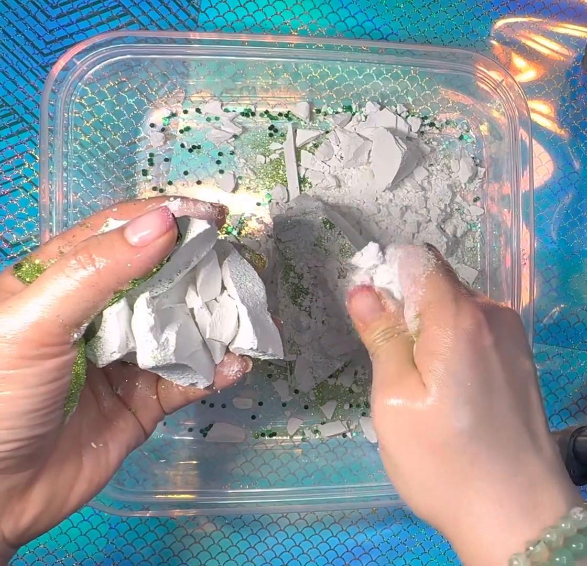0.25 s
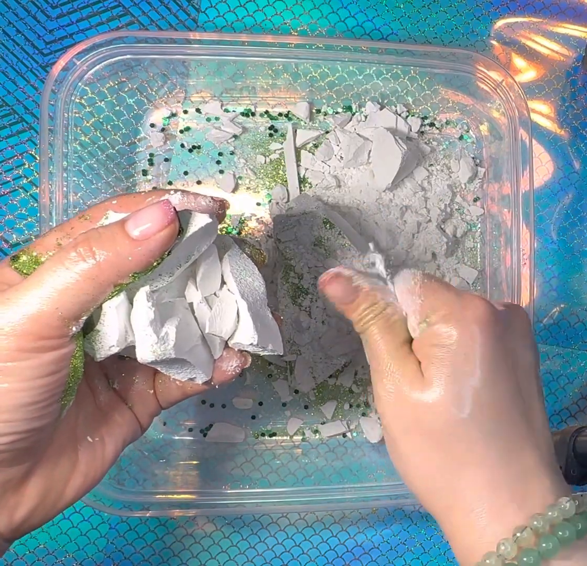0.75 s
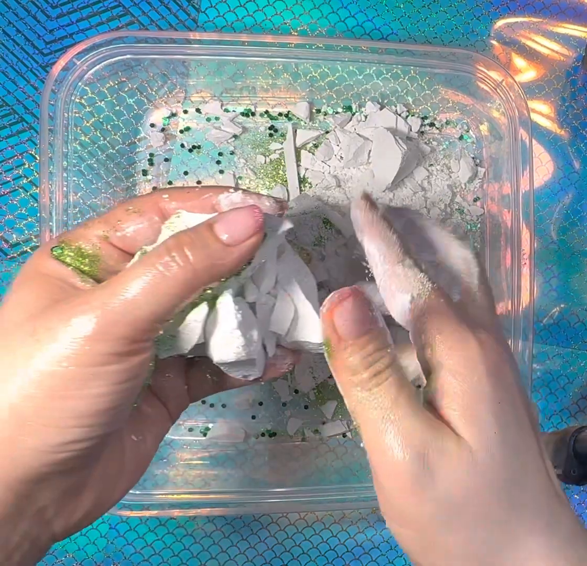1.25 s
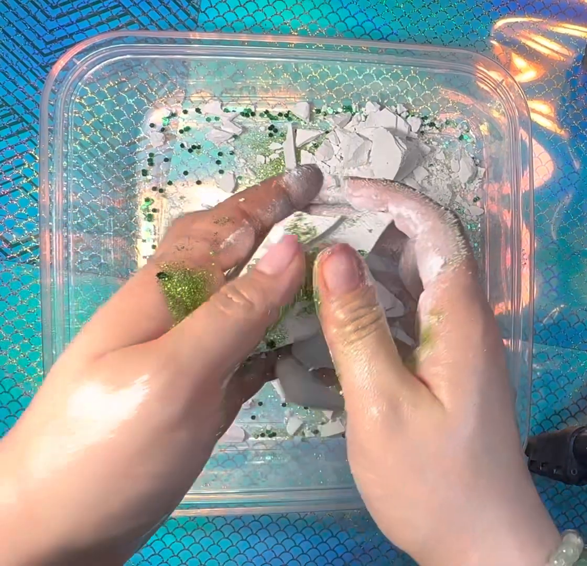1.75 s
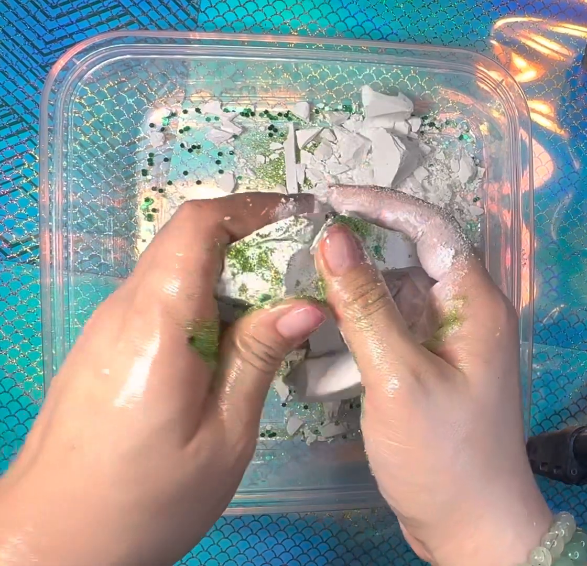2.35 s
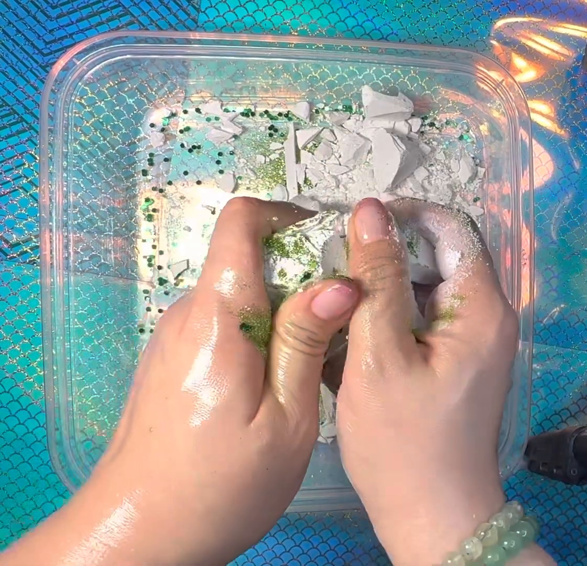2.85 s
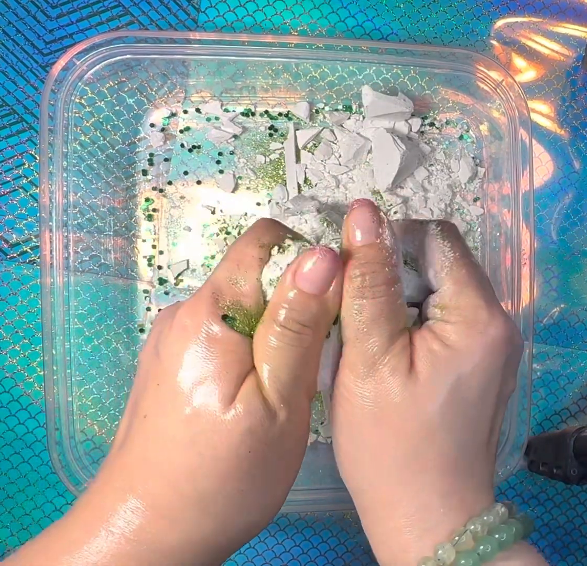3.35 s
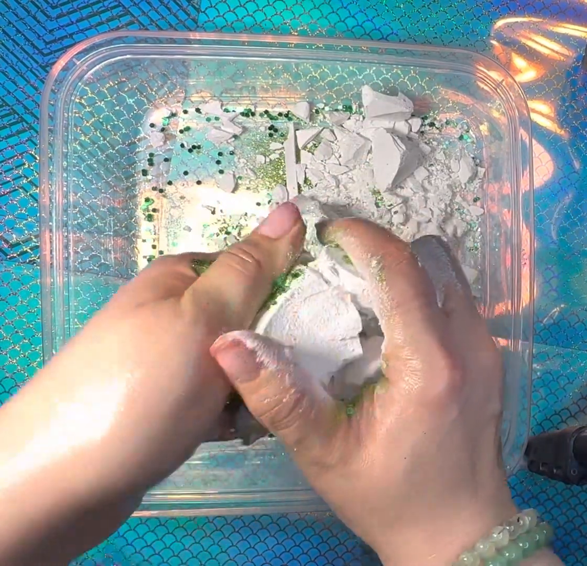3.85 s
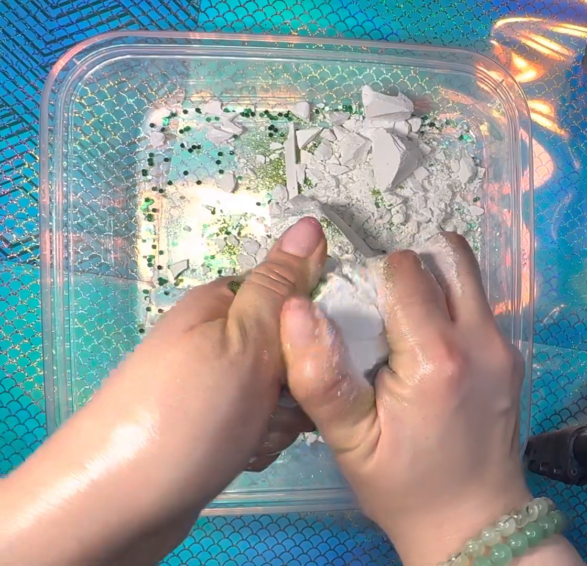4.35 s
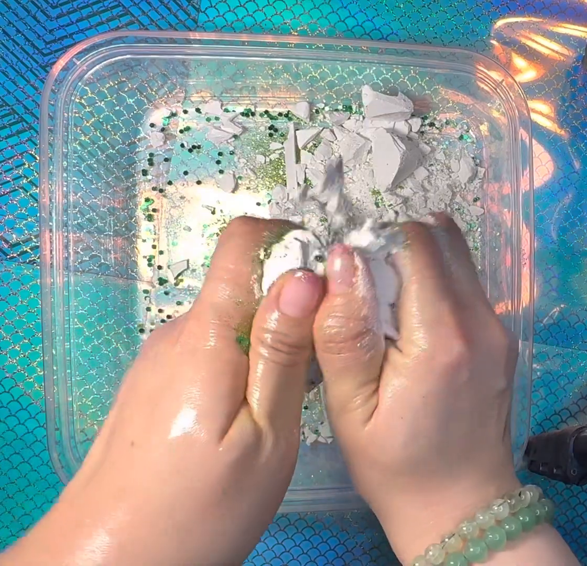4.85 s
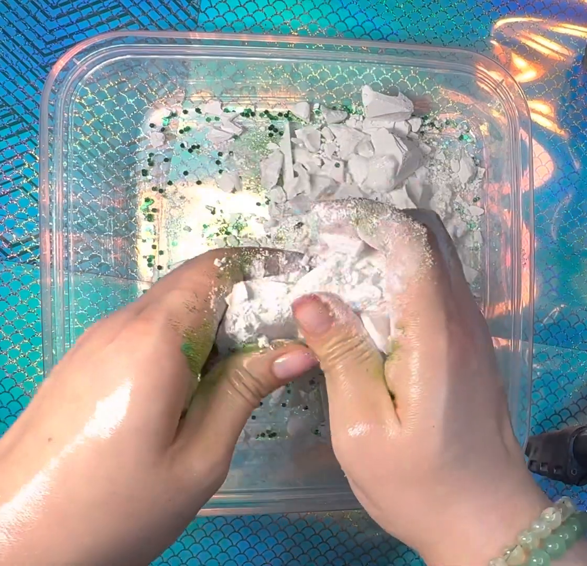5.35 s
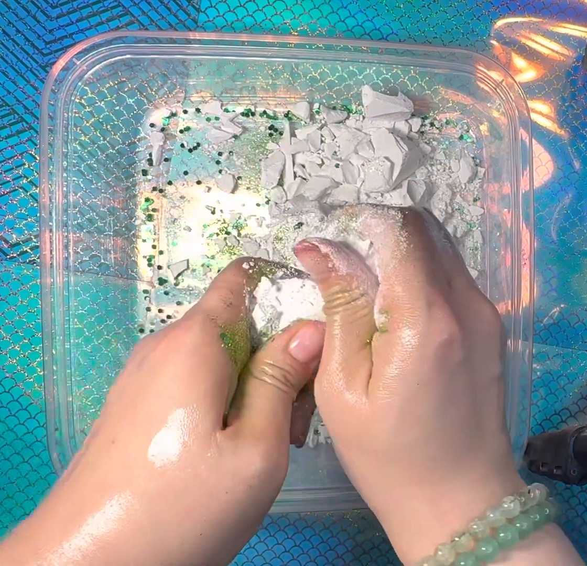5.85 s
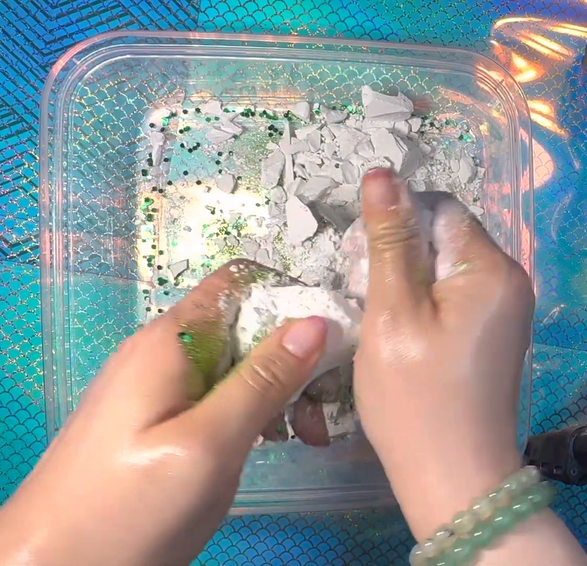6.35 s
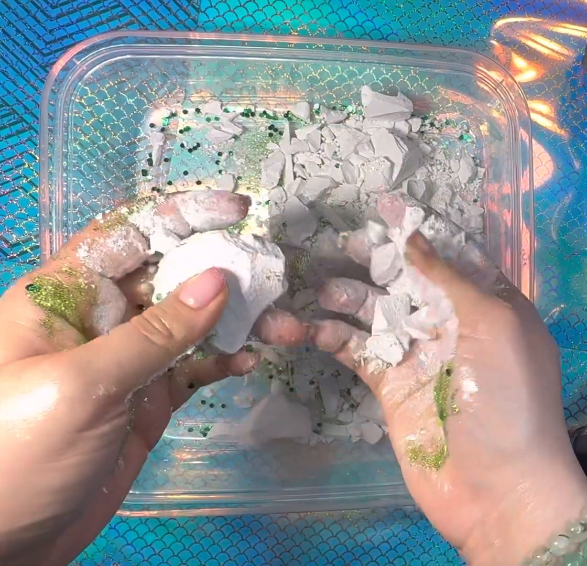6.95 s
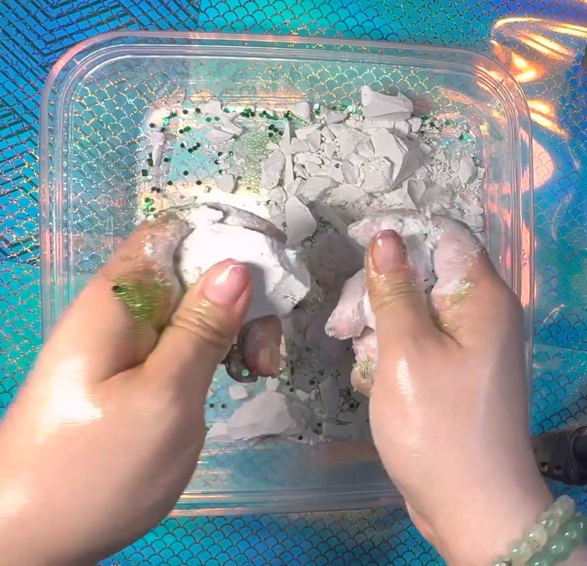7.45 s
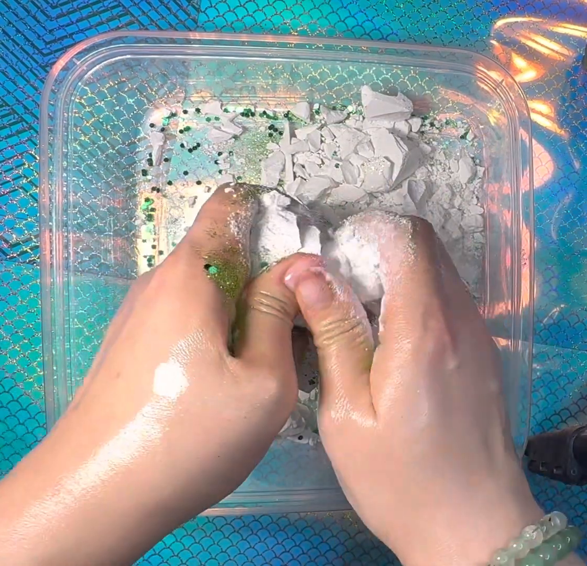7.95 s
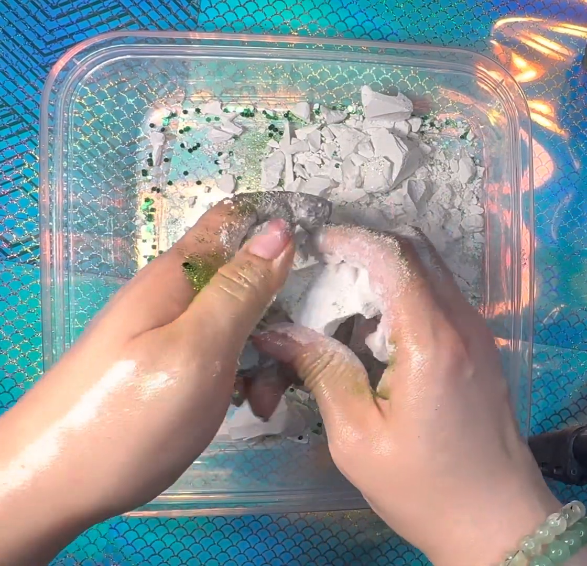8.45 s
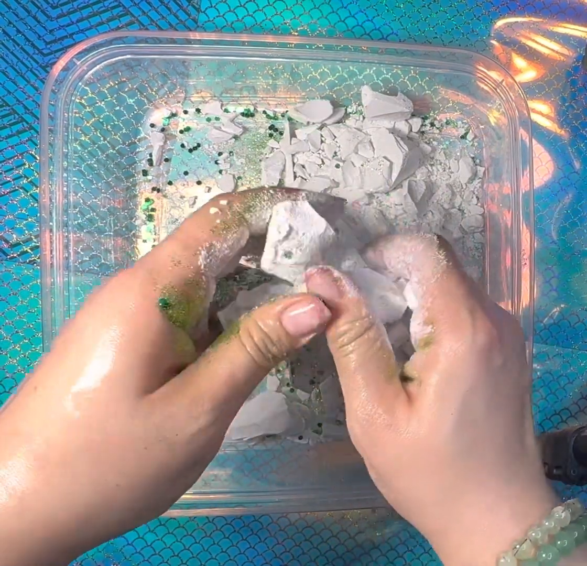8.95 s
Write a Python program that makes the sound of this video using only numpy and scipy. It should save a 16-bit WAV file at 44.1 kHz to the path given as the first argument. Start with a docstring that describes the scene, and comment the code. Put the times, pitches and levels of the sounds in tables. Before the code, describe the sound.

Close-up stereo sound of brittle chalk blocks breaking between dusty hands indoors. Hollow, mid-pitched pops and crisp ticks come irregularly over fine crackle, skin rubbing and soft handling rumble. After a sparse start, the crumbling grows dense, peaks with a heavy crack and dull tub thuds, then continues in separated snaps and soft crumbs. Short room reflections, very faint low air.

```python
"""A small room: two hands squeeze dry gym chalk over a plastic tub, close to a stereo microphone.
Each fracture sums a burst of stepped noise (crack), decaying sines (hollow ring) and a low pulse (push).
Between fractures, dense random grains crackle as crumbs and shaped noise hisses as powder and skin.
Falling pieces excite the damped modes of the tub; sparse echoes and a noise tail make the room."""
import sys
import numpy as np
from scipy import signal
from scipy.fft import rfft, irfft, next_fast_len
from scipy.io import wavfile
from scipy.ndimage import map_coordinates

SR = 44100
rng = np.random.default_rng(int(sys.argv[2]) if len(sys.argv) > 2 else 0)


def wrap_up_sound(samples):
    """Save the sound to the file named by the first command line argument, as 16-bit audio."""
    columns = np.atleast_2d(samples).T
    # keep every value between -1 and 1, then stretch to whole-number steps
    tamed = np.clip(columns, -1, 1)
    steps = np.round(tamed * 32767).astype(np.int16)
    wavfile.write(sys.argv[1], SR, steps)


N = 405719  # length in samples
SIDES = np.array([[1], [-1]])  # left, right


def amp(db):
    """Level to gain: 20 dB is a factor of ten in amplitude."""
    return 10 ** (np.asarray(db) / 20)


def unit(x):
    """Power normalisation: scaled to rms 1."""
    return x / np.sqrt(np.mean(x ** 2) + 1e-20)


def burst(x):
    """Energy normalisation: scaled to the energy of 5 ms at rms 1."""
    return x / np.sqrt(np.sum(x ** 2) / (SR * .005) + 1e-20)


def along(points, hz):
    """Interpolation of (Hz, value) points on a logarithmic frequency axis."""
    f, v = np.transpose(points)
    return np.interp(np.log(hz + 1), np.log(f + 1), v)


def wobble(rate):
    """Slow random modulation: a smooth curve through `rate` random knots a second."""
    knots = rng.standard_normal(int(N * rate / SR) + 4)
    at = np.arange(0, len(knots) - 1, 1 / 8)
    curve = map_coordinates(knots, [at])
    return np.interp(np.arange(N) * rate / SR, at, curve)


def filtered(x, response):
    """Linear filtering: the spectrum of x times a response of frequency."""
    m = next_fast_len(N + SR // 4)
    hz = np.fft.rfftfreq(m, 1 / SR)
    return irfft(rfft(x, m) * response(hz), m)[..., :N]


def coloured(x, spectrum):
    """Spectral shaping: x filtered by (Hz, dB) points, at rms 1."""
    return unit(filtered(x, lambda hz: amp(along(spectrum, hz))))


def band_noise(order, low_hz, high_hz, count):
    """Band-limited noise at rms 1."""
    band = signal.butter(order, [low_hz, high_hz], 'band', fs=SR, output='sos')
    return unit(signal.sosfilt(band, rng.standard_normal(count)))


def noise(width):
    """Mid-side stereo white noise; width is side over mid."""
    mid, side = rng.standard_normal((2, N))
    return np.array([mid + width * side, mid - width * side])


def add(track, s, sound):
    """Superposition: mix a sound in from time s."""
    i = max(0, round(s * SR))
    room_left = track[..., i:i + sound.shape[-1]]
    room_left += sound[..., :room_left.shape[-1]]


def strike(t, rise, decay):
    """Impact envelope: exponential swell to a rounded top near time 0, then exponential decay."""
    return np.exp(-np.logaddexp(-t / rise, t / decay))


def swells(rows):
    """Gaussian envelopes: a gain that rises and falls around each (s, half length s, dB) row."""
    t = np.linspace(0, N / SR, N // 20)
    gain = sum(amp(db) * np.exp(-((t - s) / half) ** 2) for s, half, db in rows)
    return np.interp(np.arange(N) / SR, t, gain)


def grains(rate, centre_hz, spread, cycles, size_db):
    """Granular synthesis: tiny breaks of random time, size, pitch and side, at rms 1."""
    count = int(rate * N / SR)
    when, pitch, size, pan = rng.random((count, 4)).T[:, :, None]
    hz = centre_hz * np.exp(spread * (2 * pitch - 1))
    k = np.arange(int(min(5 * cycles / centre_hz, .005) * SR))
    turns = hz * k / SR
    gain = amp(size_db * np.minimum(-np.log(1 - size), 4))
    envelope = np.exp(-turns / cycles) * (1 - np.exp(-2 * turns))
    waves = gain * np.sin(2 * np.pi * turns) * envelope
    index = ((when * N).astype(int) + k).ravel()
    panned = [(waves * (1 + side * (pan - .5) * 3.1)).ravel() for side in (1, -1)]
    return unit(np.array([np.bincount(index, w, N)[:N] for w in panned]))


# loud fractures and knocks of chalk; levels before the trims passed to snaps():
# start_s [s], ring_hz [Hz], ring_db [dB], crack_db [dB], push_db [dB]
FRACTURES = [(0.3338, 1906, -47, -34, -60), (0.3422, 2250, -41, -40, -48), (1.0886, 2350, -60, -60.5, -67),
             (1.797, 1370, -47.5, -66.5, -60), (1.856, 1516, -16, -44.5, -41),
             (1.9533, 1460, -41, -60, -58), (2.0843, 1360, -25, -41.5, -41.5), (2.191, 2160, -76, -52, -72),
             (2.306, 1320, -44, -56.5, -47), (2.3924, 1670, -45.5, -49.5, -64),
             (2.4615, 1900, -57, -41, -50), (2.5881, 2370, -50, -46.5, -58), (2.569, 1860, -64, -57, -70),
             (2.606, 2640, -53, -54, -72), (2.6505, 2110, -66, -49.5, -67), (2.721, 1910, -59, -55.5, -72),
             (2.7588, 1660, -46, -72, -68), (2.8471, 2170, -47.5, -49, -61),
             (2.8677, 2240, -45.5, -44, -57), (2.896, 2120, -53.5, -47.5, -73.5),
             (3.0617, 2680, -52.5, -51, -79), (3.194, 2480, -44.5, -45.5, -70),
             (3.285, 2370, -52, -49.5, -60), (3.7579, 1950, -39, -53.5, -54),
             (3.8464, 1420, -36, -66.5, -44), (3.943, 2270, -62, -44.5, -80),
             (4.0116, 2150, -38.5, -35.5, -49.5), (4.0404, 2230, -39, -32, -69.5),
             (4.0661, 1250, -40.5, -59, -53), (4.102, 2200, -57, -53.5, -72),
             (4.2085, 880, -47.5, -53, -62), (4.218, 1410, -47, -62.5, -66), (4.301, 1380, -39, -52, -44.5),
             (4.308, 2390, -40, -42, -51), (4.3211, 1730, -33.5, -47, -47), (4.3275, 1320, -35, -32, -46),
             (4.338, 2220, -25, -29, -60), (4.6005, 1390, -49, -43.5, -55), (4.673, 2330, -55, -46, -81),
             (4.9142, 1230, -35, -49, -47.5), (4.9193, 1230, -38, -63.5, -42.5),
             (4.9501, 1900, -63, -49, -65), (5.049, 1980, -53, -50, -71), (5.1403, 2370, -50, -51, -60),
             (5.172, 1900, -55.5, -57, -64), (5.209, 1700, -54, -53.5, -66),
             (5.229, 2160, -46.5, -59.5, -55), (5.252, 1380, -27.5, -41, -41),
             (5.3038, 1580, -49, -55, -53), (5.318, 1750, -60, -59, -64), (5.348, 2000, -60, -54.5, -68),
             (5.379, 1490, -54, -66, -60), (5.4058, 1530, -37, -39, -67), (5.4418, 1650, -30.5, -56, -51),
             (5.4831, 1500, -46.5, -57, -53.5), (5.506, 2240, -56, -46, -73), (5.49, 2300, -61, -49, -72),
             (5.538, 1890, -63, -55, -72), (5.576, 1660, -50.5, -65, -65), (5.586, 2470, -51, -47.5, -67),
             (5.6305, 1750, -44, -51, -59), (5.692, 1900, -65, -58, -72), (5.749, 2400, -57, -44, -74),
             (5.7557, 2080, -48, -37.5, -74), (5.775, 1250, -43, -56, -73),
             (5.9161, 2160, -36, -43.5, -52.5), (6.019, 2130, -52, -48.5, -72),
             (6.0648, 2280, -41.5, -35, -59), (6.124, 2230, -55.5, -53.5, -68),
             (6.248, 2520, -74, -54.5, -60), (6.315, 2260, -73, -63, -70), (6.607, 1990, -64, -62, -74),
             (6.655, 1400, -50, -50, -83), (6.694, 1790, -24, -38.5, -56), (6.6941, 1180, -28, -43.5, -51),
             (6.7194, 820, -28, -49.5, -38), (6.7205, 1870, -38, -50, -53),
             (6.7465, 1360, -33.5, -56.5, -50), (6.757, 1700, -44, -54.5, -57.5),
             (6.765, 1100, -45, -55.5, -43), (6.835, 1200, -40.5, -68, -68),
             (6.9207, 1370, -45, -56, -41.5), (6.945, 1380, -39.5, -53, -40.5),
             (7.1365, 1660, -51.5, -45, -60), (7.308, 2440, -61, -55.5, -79), (7.399, 2800, -62, -59, -76),
             (7.471, 1820, -55, -65.5, -71), (7.5012, 1070, -36, -41.5, -36),
             (7.7586, 2516, -60, -58.5, -73), (7.8519, 2250, -31, -41, -52),
             (7.8527, 1120, -34, -28.5, -41), (8.0435, 1730, -37.5, -37, -35.5),
             (8.0876, 2370, -41.5, -41, -66), (8.1117, 1350, -32, -54, -43.5),
             (8.225, 1810, -49, -56.5, -68), (8.245, 1590, -53, -55.5, -66), (8.278, 2610, -63, -57, -70),
             (8.482, 2206, -52, -49.5, -58), (8.5656, 1510, -51.5, -77, -60), (8.7946, 1230, -38, -67, -48),
             (8.8196, 1160, -45.5, -63, -64), (8.8844, 1560, -43, -59.5, -76),
             (9.0203, 780, -48.5, -82, -44), (9.0607, 1610, -51, -71, -57)]
# colour of the crack: frequency_hz [Hz], level_db [dB]
CRACK_COLOUR = [(500, -13.5), (1000, -2), (2000, -11), (3500, -2), (7500, 0.5), (10000, -1.5)]
# time (s) a break takes in a piece of this ring (Hz); bigger, lower pieces take a little longer
RUN_S, RUN_AT_HZ, RUN_GROWS = 0.00076, 1610, 0.23


def snaps(breaks, ring_db, crack_db, push_db, ring_hold, push_hz, push_decay, rough,
          splinter_db, splinter_decay, clump_db, brittle_db):
    """Brittle fracture: quick steps among splinters ring the hollow of the hands and push the air."""
    out, lead = np.zeros((2, N)), SR // 60
    t = np.arange(-lead, SR // 25) / SR
    after = np.maximum(t, 0)
    grit = coloured(noise(0.091), CRACK_COLOUR)
    for s, hz, ring, crack, push in breaks:
        run = RUN_S * (RUN_AT_HZ / hz) ** RUN_GROWS
        phases, pan_db, start = rng.uniform(0, 2 * np.pi, 3), rng.normal(), rng.integers(N - len(t))
        # random levels held for a third of a millisecond (steps) and for longer (clumps)
        steps, clumps = [np.repeat(rng.standard_normal(len(t)).clip(-2, 2), size)[:len(t)]
                         for size in (SR // 3000, SR // 800)]
        # weak pieces crumble into their break; strong ones give way all at once
        weak = np.clip((brittle_db - max(ring, crack)) / 15, 0, 1)  # share 0-1
        splinter_gain = amp(splinter_db + 4.5 * weak + clump_db * clumps)
        splinters = splinter_gain * strike(t, run * (0.45 + 3 * weak), splinter_decay)

        partials = [(1.014, 0.9), (0.96, 0.066), (.8, 0.2)]  # (share of the ring pitch, gain)
        hollow = sum(g * np.sin(2 * np.pi * hz * k * t + p) for (k, g), p in zip(partials, phases))
        scatter = band_noise(3, hz * 0.65, hz * 1.5, len(t))
        tone = hollow * strike(t - .0004, 0.3 * run, ring_hold * run) + rough * scatter * splinters
        tone = signal.sosfilt(signal.butter(2, hz * 0.27, 'high', fs=SR, output='sos'), tone)

        split_gain = amp(3 * steps) * strike(t - .0003, 0.74 * run, .9 * run) + splinters
        split = grit[:, start:start + len(t)] * split_gain

        puff_hz = push_hz * amp(rng.normal(0, 2.03))
        puff = np.sin(2 * np.pi * puff_hz * after) * after * np.exp(-after / push_decay)

        sound = amp(ring + ring_db) * burst(tone) + amp(crack + crack_db) * burst(split)
        sound = sound + amp(push + push_db) * burst(puff)
        add(out, s - lead / SR, sound * amp(.5 * pan_db * SIDES))
    return out


CHIP_HZ, CHIP_OCTAVES = 1730, 0.74  # middle and half range of the ring
# ring over the crumbs, crack over the mean of crumbs and powder, before the trims of snaps()
CHIP_RING_DB, CHIP_CRACK_DB = 9, 8.5
CHIP_PUSH_DB, CHIP_SCATTER_DB = -11, 8.5  # push over the ring; half range of strength
CHIP_SHARP_DB = -2  # change of crack at the highest ring, reversed at the lowest


def chips(levels, count):
    """Random fracture: small chips follow the crumbling, crisper when powder grinds; rows as FRACTURES."""
    when, pitch, size = rng.random((count, 3)).T
    at = (when * N).astype(int)
    powder_db, crumb_db = [db[at] + CHIP_SCATTER_DB * (2 * size - 1) for db in levels[:2]]
    small = 2 * pitch - 1
    hz = CHIP_HZ * 2 ** (CHIP_OCTAVES * small)
    ring = crumb_db + CHIP_RING_DB
    crack = (crumb_db + powder_db) / 2 + CHIP_CRACK_DB + CHIP_SHARP_DB * small
    return list(zip(when * N / SR, hz, ring, crack, ring + CHIP_PUSH_DB))


# a piece collapses into small breaks: start_s [s, middle], half_length_s [s], level_db [dB]
COLLAPSES = [(0.555, 0.012, -69), (0.67, .025, -77), (4.301, .004, -50), (4.325, 0.013, -40),
             (4.348, 0.0046, -44), (5.05, 0.011, -61), (5.133, 0.01, -63), (5.2, 0.029, -58),
             (5.305, 0.012, -56), (5.38, 0.029, -60), (5.52, 0.032, -66), (5.62, 0.021, -57),
             (6.706, 0.0067, -39), (6.729, 0.011, -44), (8.81, 0.018, -56), (8.855, 0.029, -64.5),
             (9.135, 0.035, -66), (6.958, 0.011, -45)]


def crunches():
    """Cascading fracture: showers of small hollow breaks under a swelling gain."""
    shower = grains(rate=600, centre_hz=1480, spread=0.71, cycles=1.0, size_db=5.5)
    return swells(COLLAPSES) * shower


# chalk slips on chalk: start_s [s, middle], half_length_s [s], pitch_hz [Hz], level_db [dB]
SLIP_RUNS = [(4.0414, 0.00064, 2260, -30.5), (8.0444, 0.001, 2390, -26), (8.059, 0.0049, 2370, -30.5)]


def judders(slip_gap_s, ring_s):
    """Stick-slip friction: uneven slips in quick succession each ring the hollow of the hands."""
    out, t = np.zeros(N), np.arange(-SR // 40, SR // 40) / SR
    for s, half, hz, db in SLIP_RUNS:
        slips = slip_gap_s * (np.arange(-6, 7) + rng.uniform(-.3, .3, 13))[:, None]
        age = np.maximum(t - slips + ring_s, 0)
        strength = np.exp(-(slips / half) ** 2)
        rings = strength * np.sin(2 * np.pi * hz * age) * age * np.exp(-age / ring_s)
        add(out, s + t[0], amp(db) * burst(rings.sum(0)))
    return out


# strokes of chalk on chalk: start_s [s, middle], half_length_s [s], level_db [dB]
STROKES = [(0.422, .015, -67.5), (0.555, 0.017, -61.5), (0.66, 0.017, -71), (0.78, 0.031, -70),
           (1.088, 0.011, -72), (3.205, 0.035, -60), (4.975, 0.031, -61.5), (5.2, 0.01, -58),
           (5.262, 0.011, -52), (5.304, 0.016, -57.5), (5.615, .018, -61), (6.107, 0.045, -59.5),
           (6.704, 0.0091, -46), (6.764, .006, -60), (7.188, 0.028, -61.5), (8.057, 0.018, -41)]


def scuffs():
    """Rough sliding contact: dense grains swell and fade with each short stroke."""
    dense = grains(rate=2800, centre_hz=2800, spread=0.8, cycles=0.82, size_db=4.5)
    return swells(STROKES) * coloured(dense, [(500, -10.5), (2000, -8.5), (8000, 3.5)])


# squeezes and shifts of the grip, levels before the trims of each layer:
# start_s [s, full pressure], hold_s [s], powder_db, crumbs_db, skin_rub_db, grip_db [dB]
GRIP_SQUEEZES = [(0.047, 0.16, -113, -99, -73.5, -69.5), (0.31, 0.15, -100, -78.5, -63, -63.5),
                 (0.527, 0.38, -81.5, -81, -80, -92), (0.565, 0.077, -99, -83, -73, -68.5),
                 (1.09, 0.24, -80, -78, -96, -91), (1.929, 0.22, -68.5, -73.5, -78, -75),
                 (2.231, 0.12, -68.5, -71, -93, -67), (2.521, 0.33, -75.5, -76.5, -75, -71),
                 (3.14, 0.17, -67, -77.5, -65, -69.5), (3.397, 0.22, -67.5, -73, -59, -61),
                 (3.73, 0.053, -73, -65.5, -79, -69), (4.082, 0.23, -87.5, -67, -90, -72),
                 (4.457, 0.045, -65, -68.5, -65, -74), (4.596, 0.72, -69.5, -80, -66, -77),
                 (4.964, 0.3, -63.5, -67, -70, -68), (5.218, 0.27, -67, -62.5, -70, -70),
                 (5.595, 0.145, -74, -75, -67.5, -67.5), (5.851, 0.21, -77.5, -74, -68.5, -70),
                 (6.23, 0.14, -79.5, -80, -73, -67), (6.747, 0.0096, -69, -64, -58, -66),
                 (6.964, 0.21, -78, -73, -72, -69), (7.287, 0.13, -73, -74.5, -71.5, -73.5),
                 (8.05, 0.069, -75.5, -70.5, -67, -78), (8.224, 0.44, -80, -79, -84, -80.5),
                 (8.755, 0.37, -83.5, -75, -81.5, -70)]
# hands only holding the chalk: powder_db, crumbs_db, skin_rub_db, grip_db [dB]
RESTING_LEVELS = [-96.5, -92, -78.5, -76.5]
SQUEEZE_ATTACK_S, SQUEEZE_RELEASE_S = 0.0842, 0.078  # time constants of tightening and letting go


def squeezing():
    """Power addition of exponential pressures: levels (dB) of powder, crumbs, skin rub and grip."""
    t = np.linspace(0, N / SR, N // 100)
    power = amp(RESTING_LEVELS)[:, None] ** 2
    for start, hold, *db in GRIP_SQUEEZES:
        tighten = (t - start) / SQUEEZE_ATTACK_S
        let_go = (start + hold - t) / SQUEEZE_RELEASE_S
        pressure = np.exp(np.minimum(0, np.minimum(tighten, let_go)))
        power = power + (amp(db)[:, None] * pressure) ** 2
    return [np.interp(np.arange(N) / SR, t, 10 * np.log10(p)) for p in power]


# colour of the ground powder: frequency_hz [Hz], level_db [dB]
POWDER_COLOUR = [(900, -18.5), (2000, -13.5), (3500, -0.5), (5000, -3.5), (6500, 2), (8000, 4.5),
                 (9500, -3)]
GRIT_DB = -5  # single grains that burst, over the powder


def grinding(powder_db, slip):
    """Comminution: powder hisses as coloured noise and fine grains, with single bursting grains."""
    fine = grains(rate=2500, centre_hz=6100, spread=0.18, cycles=.6, size_db=10.0)
    dust = amp(0.5) * coloured(noise(0.05), POWDER_COLOUR) + amp(-7.5) * coloured(fine, POWDER_COLOUR)
    powder = amp(powder_db + slip / 2 + wobble(45)) * dust
    bursting = grains(rate=260, centre_hz=3800, spread=.8, cycles=1.3, size_db=5)
    return powder + amp(powder_db + GRIT_DB + slip) * bursting


# hollows between the fingers, at mid opening: pitch_hz [Hz], width_hz [Hz], level_db [dB]
HOLLOWS = [(912, 200, -5.5), (2350, 210, 6), (2750, 150, -1.5), (3950, 650, -0.5)]
PALM_SHIFT, PALM_SHIFT_RATE = 0.033, 6.4  # share of the pitch; moves a second


def cupped(x):
    """Cavity resonance: x rings in hollows between the fingers, which keep changing size."""
    opening, out = np.tanh(wobble(PALM_SHIFT_RATE)), 0
    for step in (-1, 0, 1):
        modes = [(c * (1 + PALM_SHIFT * step), w, db) for c, w, db in HOLLOWS]

        def response(f):
            """Sum of band-pass resonances."""
            return sum(amp(db) * 1j * f * w / (c * c - f * f + 1j * f * w) for c, w, db in modes)

        # crossfade between the three sizes
        share = np.sqrt(np.clip(1 - abs(opening - step), 0, 1))
        out = out + share * filtered(x, response)
    return unit(out)


# colour of skin dragging under pressure: frequency_hz [Hz], level_db [dB]
GRIP_COLOUR = [(120, -16), (250, 6.5), (350, 2.5), (490, 2), (680, -15.5), (1500, -46)]


def crumbling(levels):
    """Friction under load: squeezed chalk grinds to crumbs and powder while dusty skin slides over it."""
    powder_db, crumb_db, rub_db, grip_db = levels
    slip = 1.6 * wobble(22) + 1.3 * wobble(90)  # the grip slips and catches (dB)
    coarse = grains(rate=800, centre_hz=1500, spread=0.52, cycles=1.8, size_db=4.7)
    crumbs = amp(crumb_db + 1.5 + slip) * coarse
    scrape = noise(0.28) + grains(rate=1300, centre_hz=2650, spread=0.33, cycles=0.62, size_db=0.0)
    rub = amp(rub_db - 4 + slip + 2 * wobble(11)) * cupped(scrape)
    grip = amp(grip_db - 0.5 + 0.5 * wobble(21)) * coloured(noise(1.0), GRIP_COLOUR)
    return grinding(powder_db, slip) + crumbs + rub + grip


# crumbs tap fingers and heap: start_s [s, about the top of the swell], pitch_hz [Hz], level_db [dB]
SOFT_TAPS = [(0.442, 1000, -62.5), (1.052, 1200, -72), (1.078, 1470, -65), (1.106, 1154, -63.5),
             (1.133, 1340, -68), (1.174, 1500, -79), (1.219, 435, -58), (1.234, 1200, -65),
             (1.253, 610, -68), (1.271, 1260, -61), (1.312, 1190, -70), (2.738, 1520, -63),
             (4.153, 1500, -58.5), (4.181, 1320, -51.5), (5.297, 1580, -46), (5.362, 1450, -53),
             (5.605, 1700, -52), (6.803, 1150, -47), (7.021, 1430, -54), (7.411, 1250, -58),
             (8.313, 1230, -61), (8.921, 1240, -58), (9.009, 825, -60.5), (9.106, 1494, -61)]


def taps(rise, cycles, rough):
    """Soft impact: a contact swells for a moment and rings for a few cycles, without a crack."""
    out, t = np.zeros(N), np.arange(SR // 25) / SR
    for s, hz, db in SOFT_TAPS:
        blur = band_noise(2, hz * 0.76, hz * 1.2, len(t))
        tone = np.sin(2 * np.pi * hz * t) + rough * blur
        envelope = (1 - np.exp(-(t / rise) ** 2)) * np.exp(-t * hz / cycles)
        add(out, s - rise, amp(db) * burst(tone * envelope))
    return out


# thin flakes that tinkle: start_s [s], pitch_hz [Hz], level_db [dB]
THIN_FLAKES = [(2.192, 7530, -47), (2.462, 7460, -45), (5.041, 6400, -46), (5.68, 6380, -52.5),
               (6.867, 6400, -67), (6.948, 6200, -55), (7.019, 6520, -53), (8.453, 4530, -60)]


def flakes(t60):
    """Free vibration: thin flakes ring briefly as they land, falling 60 dB in t60 seconds."""
    out, t = np.zeros(N), np.arange(SR // 6) / SR
    for s, hz, db in THIN_FLAKES:
        add(out, s, amp(db - 60 * t / t60) * np.sin(2 * np.pi * hz * t))
    return out


# fingers slide over the powdery face of a block: start_s [s, middle], half_length_s [s], level_db [dB]
FINGER_SLIDES = [(1.49, .08, -62.5), (1.6, .085, -60.5), (5.21, .06, -66)]
# colour of a slide: frequency_hz [Hz], level_db [dB]
SLIDE_COLOUR = [(900, -23.5), (1700, -13.5), (2300, -8), (3000, -11), (4000, -8), (5200, -3.5), (7500, 2),
                (9500, -1.5), (12000, -7.5)]
# the tub hums as the hands drag against it: start_s [s, middle], half_length_s [s], level_db [dB]
TUB_HUMS = [(.87, .12, -70.5), (1.15, .14, -66), (1.39, .05, -65), (1.54, .05, -61.5), (8.42, .14, -65.5)]
HUM_HZ, HUM_WIDTH_HZ = 197, 24  # centre; distance to half gain on either side


def sliding():
    """Friction and resonance: dusty skin hisses and catches; the drag sets one tub mode humming."""
    catch = amp(1.3 * wobble(24) + wobble(110))
    dust = noise(0.075) + grains(rate=900, centre_hz=3600, spread=.7, cycles=0.73, size_db=4)
    hiss = swells(FINGER_SLIDES) * coloured(dust, SLIDE_COLOUR)
    hum = unit(filtered(noise(.1), lambda hz: 1 / (1 + ((hz - HUM_HZ) / HUM_WIDTH_HZ) ** 4)))
    return catch * hiss + swells(TUB_HUMS) * hum


# an opened hand spills smaller and smaller pieces: start, mean-scale gap, first thud before the
# trim in drops(), loss per piece, contact cut-off
SPILL_S, SPILL_GAP_S, SPILL_DB, SPILL_LOSS_DB, SPILL_HZ = 6.752, 0.041, -45, 12, 1110


def spill(count):
    """Successive impacts: pieces tumble into the tub one after another; rows as in THUDS."""
    return [(SPILL_S + SPILL_GAP_S * (k + rng.uniform(-0.193, 0.246)), SPILL_DB - SPILL_LOSS_DB * k, SPILL_HZ)
            for k in range(count)]


# thuds of the tub, as pieces land or a hard break jolts it, before the trim in drops():
# start_s [s], level_db [dB], contact_cutoff_hz [Hz]
THUDS = [(0.345, -52.5, 200), (1.859, -48, 324.5), (2.087, -43.5, 330), (2.307, -47.5, 403),
         (4.329, -43, 282), (6.699, -32, 240), (6.706, -39, 200), (6.719, -33.5, 433), (6.922, -49.5, 130),
         (6.945, -53.5, 503), (7.502, -53, 800), (7.854, -53, 600), (8.045, -48, 900), (8.82, -50, 806),
         (9.018, -54, 1380), (9.045, -55.5, 904), (9.131, -56.5, 1200)]
# modes of the tub, before the heap loads and damps them: pitch_hz [Hz], level_db [dB], t60_s [s]
TUB_MODES = [(88, -13, 0.12), (142, -2, 0.19), (203, -2, 0.17), (230, -2, 0.099), (286, -4, .15),
             (346, 1, 0.084), (420, 0, .06), (465, -6, 0.12), (616, 3, 0.13), (663, -1, 0.14),
             (808.5, -1, 0.12), (958, 4, 0.07), (1035, -2, .09), (1320, 4, 0.15)]


def drops(width, damping):
    """Modal excitation: falling pieces thud on the tub floor; soft landings reach only its low modes."""
    out, t = np.zeros((2, N)), np.arange(SR // 4) / SR
    hz, db, t60 = np.transpose(TUB_MODES)[:, :, None]
    for s, level, soft_hz in THUDS + spill(count=4):
        size, side, load = rng.standard_normal((3, len(TUB_MODES), 1))
        # the heap of chalk loads and damps the floor differently at every spot
        pitch = hz * (1 + .01 * load)
        decay = amp(db + 2 * size - 60 * damping * t / t60)
        softness = 1 + (hz / soft_hz) ** 2
        modes = decay * np.sin(2 * np.pi * pitch * t) / softness
        modes = modes * np.sign(side) * (1 - np.exp(-t / 0.0011))
        thud = np.array([(modes * (1 + k * width * side)).sum(0) for k in (1, -1)])
        add(out, s, amp(level + 6.5) * burst(thud))
    return out


# low handling noise, before the trim in handling(): start_s [s], level_db [dB]
HANDLING_LEVEL = [(0, -80), (.7, -67), (1.1, -64.5), (1.55, -64.5), (1.7, -66), (2.099, -64.5),
                  (3.9, -64.5), (4.601, -70.5), (5.45, -62), (6.1, -68), (7.8, -74.5), (8.499, -60.5),
                  (8.75, -72), (9.2, -67.5)]
# its colour: frequency_hz [Hz], level_db [dB]
HANDLING_COLOUR = [(40, -18.5), (100, -4.5), (150, 2.5), (200, 2.5), (280, -14.5), (600, -32)]


def handling():
    """Low-frequency noise of handling, amplitude modulated by a level curve and a random wobble."""
    level_db = np.interp(np.arange(N) / SR, *np.transpose(HANDLING_LEVEL))
    return amp(level_db - 4.0 + 2.1 * wobble(18)) * coloured(noise(0.078), HANDLING_COLOUR)


# decay of the room: frequency_hz [Hz], t60_s [s]
ROOM_DECAY = [(100, 0.5), (400, 0.26), (1500, 0.18), (4000, .24), (9000, 0.14), (16000, 0.019)]
# reflection colour: frequency_hz [Hz], level_db [dB]
WALL_COLOUR = [(100, 1), (300, 4), (700, 7.5), (1300, -4), (3000, -1.5), (6000, -1), (10000, -5),
               (16000, -25.5)]
# width of the room: frequency_hz [Hz], side_over_mid [ratio]
ROOM_WIDTH = [(150, .2), (300, .9), (700, 1), (2000, 0.75), (8000, 1)]
# nearby surfaces, each delay varied by up to 3 %: delay_s [s], level_db [dB]
NEAR_ECHOES = [(.0028, -23.5), (.0095, -21.5)]


def room(x, tail_db):
    """Reverberation: tub and table answer within milliseconds, then the small room dies away."""
    out, hop = np.zeros((2, N)), SR // 3
    x = filtered(x.mean(0), lambda hz: amp(along(WALL_COLOUR, hz)))
    # every third of a second gets its own random tail (mid, side)
    for i in range(0, N, hop):
        hz, t, z = signal.stft(rng.standard_normal((2, SR // 3)), SR, nperseg=128)
        decay = amp(-60 * t / along(ROOM_DECAY, hz)[:, None])
        tail = signal.istft(z * decay, SR, nperseg=128)[1]
        tail = tail * np.clip(np.arange(tail.shape[1]) / SR / 0.0015 - 1, 0, 1)
        tail = amp(tail_db) * tail / np.linalg.norm(tail[0])
        for delay, db in NEAR_ECHOES:
            tail[0, round(delay * rng.uniform(.97, 1.03) * SR)] += amp(db)
        add(out, i / SR, signal.fftconvolve(x[None, i:i + hop], tail, axes=1))
    mid, side = out[0], filtered(out[1], lambda hz: along(ROOM_WIDTH, hz))
    return np.array([mid + side, mid - side])


# colour of the room air: frequency_hz [Hz], level_db [dB]
AIR_COLOUR = [(20, -13.5), (45, 0.5), (75, 7), (130, -3), (250, -8), (500, -31), (1000, -27.5),
              (2300, -38.5), (3500, -42), (8000, -51), (12000, -61.5)]


def room_air():
    """Stationary background noise: a faint rumble of air."""
    return amp(-63.5) * coloured(noise(0.3), AIR_COLOUR)


def scene():
    """Superposition of chalk, hands, tub and room over a faint rumble of air."""
    levels = squeezing()
    breaks = FRACTURES + chips(levels, count=130)
    near = snaps(breaks, ring_db=-2.0, crack_db=3.5, push_db=-4.0, ring_hold=1.03, push_hz=308,
                 push_decay=0.0011, rough=0.72, splinter_db=-24, splinter_decay=0.0054,
                 clump_db=8.0, brittle_db=-26)
    near = near + crunches() + judders(slip_gap_s=0.0019, ring_s=0.00064) + scuffs()
    near = near + crumbling(levels) + taps(rise=.0012, cycles=3.5, rough=0.78) + flakes(t60=0.056)
    near = near + sliding() + drops(width=0.18, damping=1.66) + handling()
    return near + room(near, tail_db=-15) + room_air()


# colour of the microphone: frequency_hz [Hz], level_db [dB]
MIC_COLOUR = [(8800, 0), (10000, -8), (11500, 0), (13000, 1), (14300, -2), (15600, -1), (16100, -13)]
# phase between its ports: frequency_hz [Hz], left_lead_rad [rad]
PORT_PHASE = [(20, 0), (3200, 0), (4600, .4), (5700, -.7), (7700, -1.8), (9300, -1.4), (10500, -3),
              (12500, -3.2), (15500, -4.3)]
TOP_HZ = 16600  # band limit


def record(dry):
    """Transducer response: coloured treble, ports that part in phase with frequency, and a band limit."""
    def response(hz):
        """Gain and half the phase difference to each side."""
        phase = np.exp(.5j * along(PORT_PHASE, hz) * SIDES)
        return amp(along(MIC_COLOUR, hz)) * phase * (hz < TOP_HZ)

    return filtered(dry, response)


dry = scene()
out = record(dry)
wrap_up_sound(out)
```